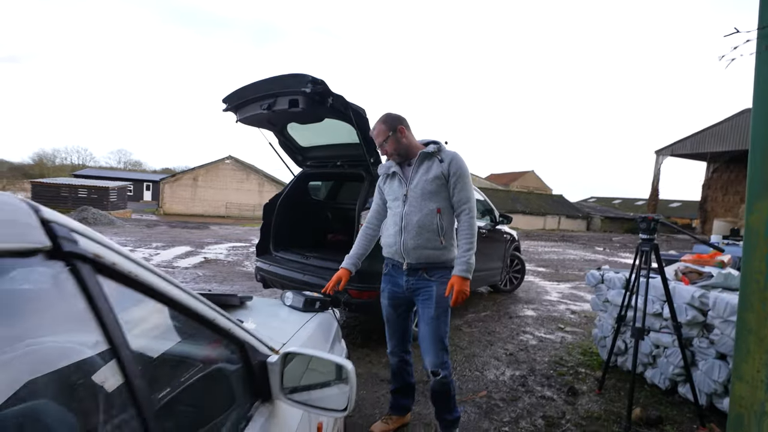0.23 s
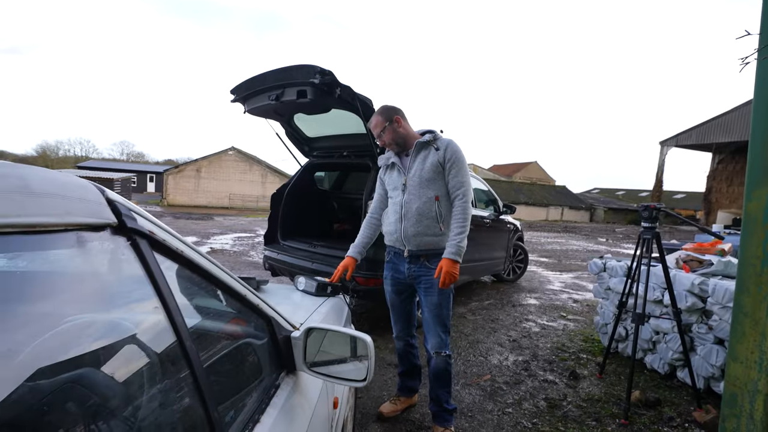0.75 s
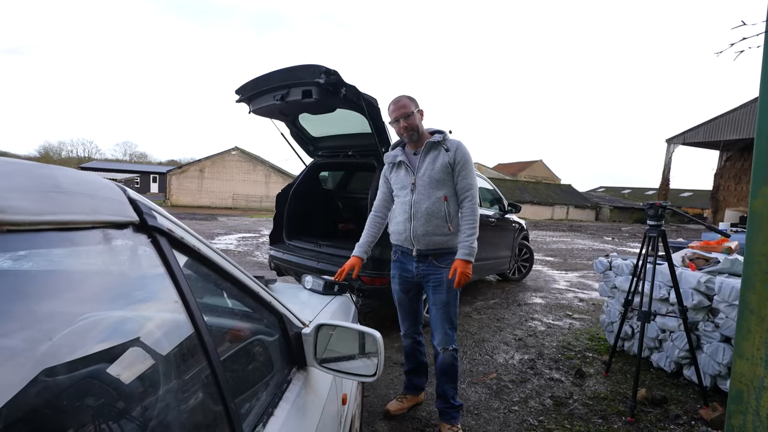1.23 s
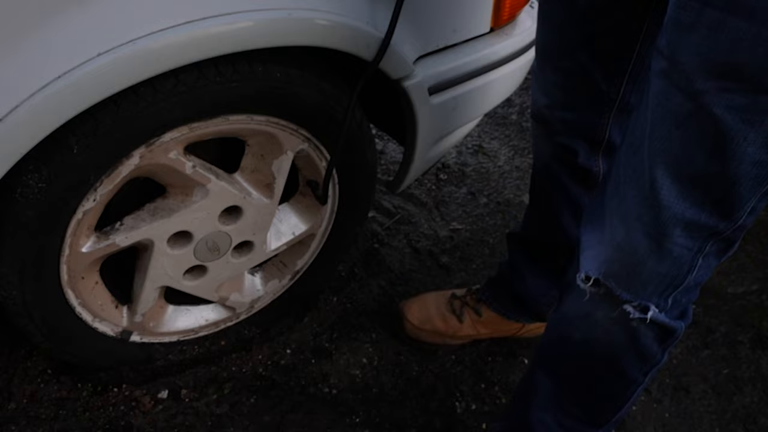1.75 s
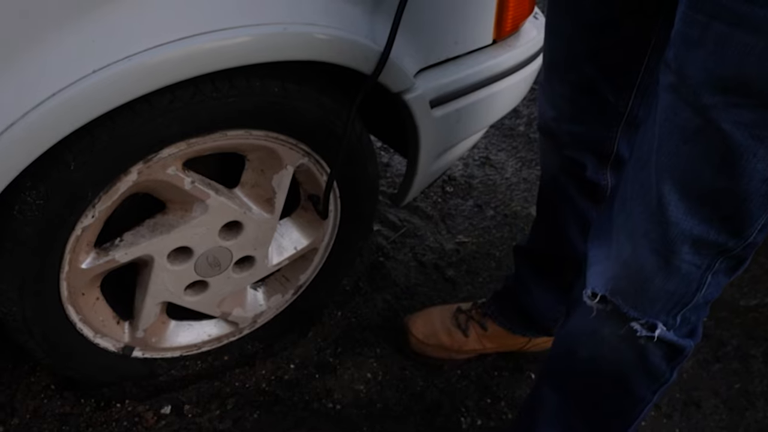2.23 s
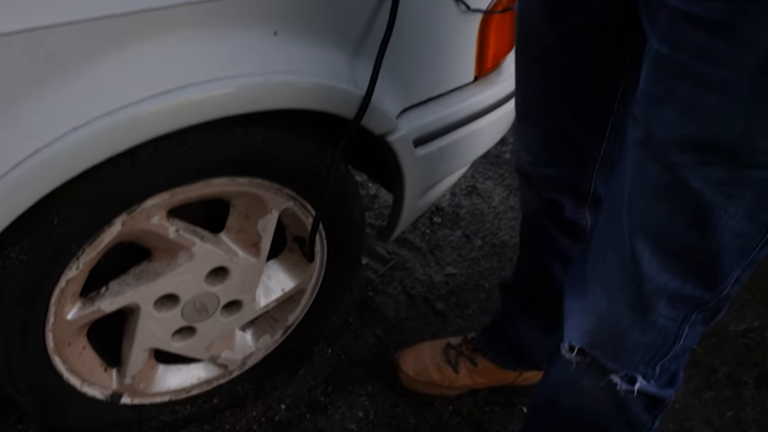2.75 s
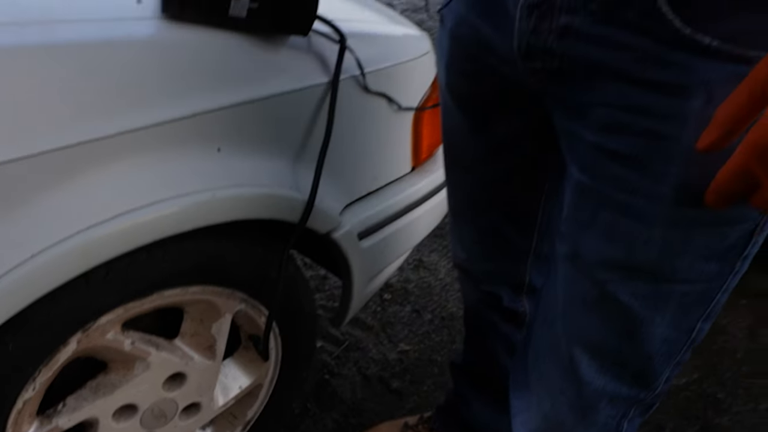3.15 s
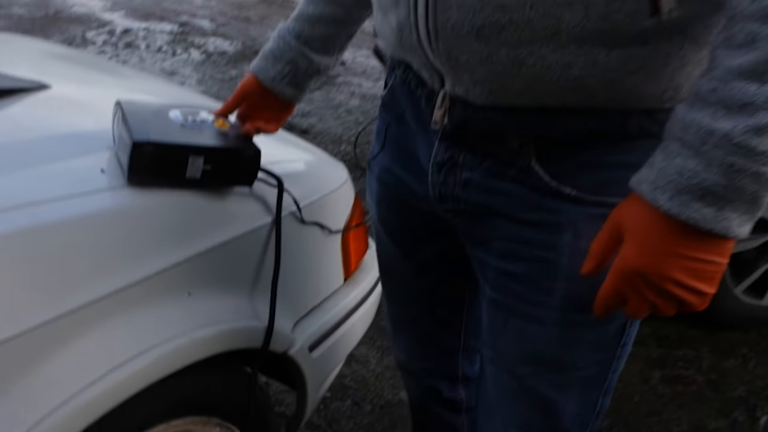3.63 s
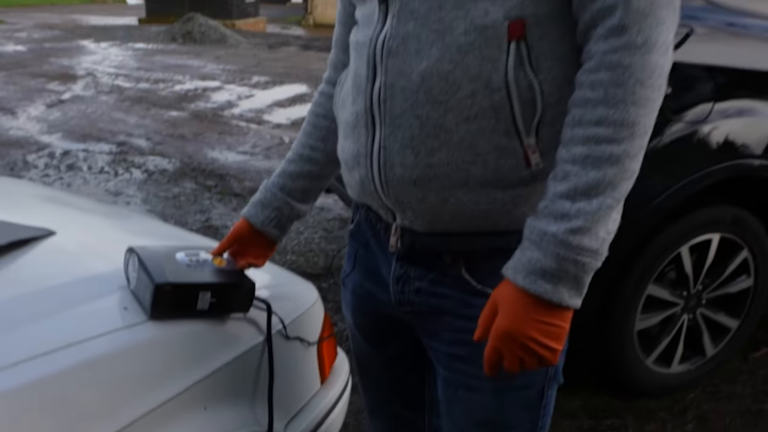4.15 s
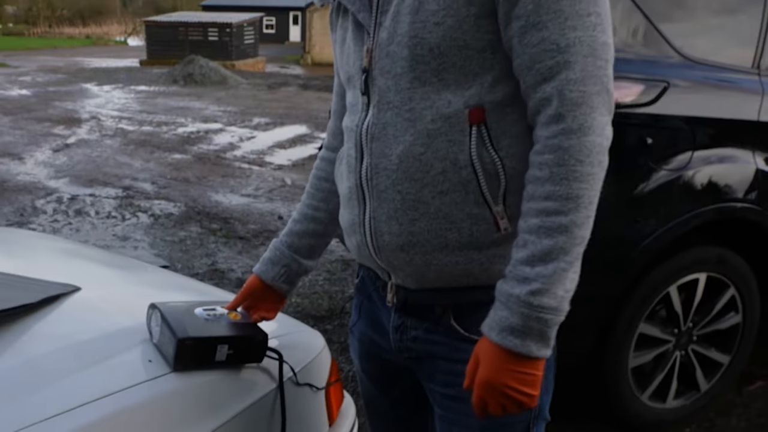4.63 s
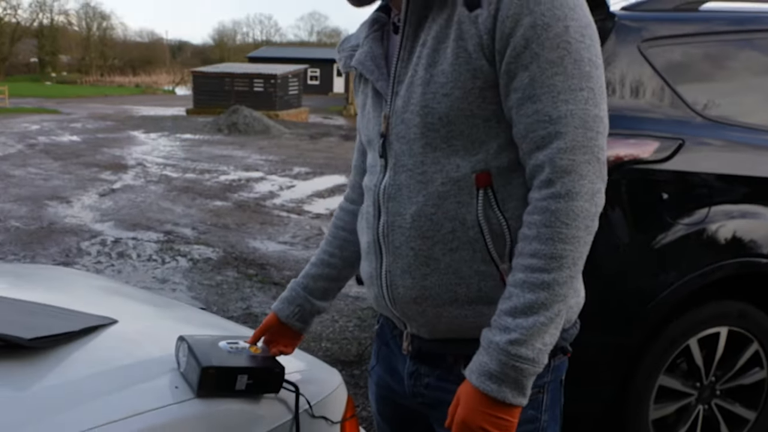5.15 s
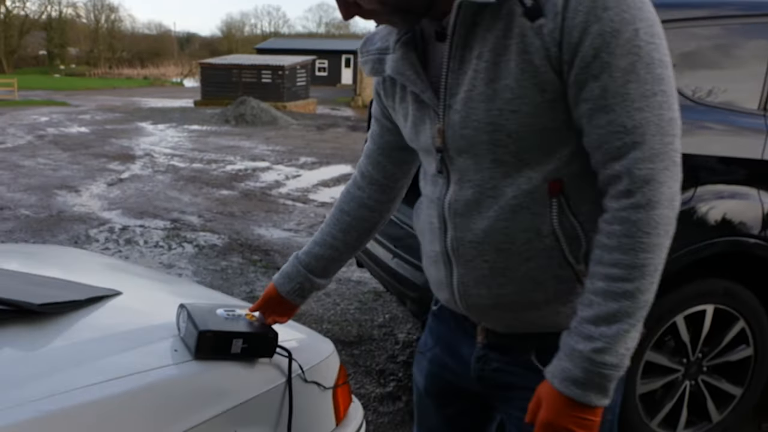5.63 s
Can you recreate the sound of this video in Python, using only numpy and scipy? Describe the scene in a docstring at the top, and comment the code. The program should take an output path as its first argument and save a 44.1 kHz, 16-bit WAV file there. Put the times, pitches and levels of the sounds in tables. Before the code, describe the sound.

Outdoor stereo pickup near a running portable air pump, louder on the right and duller on the left. The rapid throbbing buzz and valve rattle run almost throughout, heard from one spot and then another slightly lower. Soft wind rumbles, a far engine hums, and a few thuds and a scrape occur early on the left. A switch cuts the motor, leaving short ringing knocks and quiet yard air.

```python
"""Open yard: a small piston compressor buzzes on a car's boot lid, near the right microphone, shaded from the left.
Heard from two places in turn, then switched off. Delivery strokes ring head and lid (throb, buzz);
noise bursts at each contact clatter through the casing; the lid shakes with the crank. Switch and coasting knocks
are ringing cracks. Dull bumps and a noise scuff on the left; a far motorbike of summed sines enters at the
second place; wind and yard are coloured noise."""
import sys
import numpy as np
from scipy import signal
from scipy.fft import rfft, irfft, next_fast_len
from scipy.io import wavfile

SR = 44100
rng = np.random.default_rng(int(sys.argv[2]) if len(sys.argv) > 2 else 0)


def log_audio(samples):
    """Write samples as a 16-bit WAV file to the path given in sys.argv[1]."""
    # one column per channel
    frames = np.atleast_2d(samples).T
    # limit to full scale, then quantise
    limited = np.clip(frames, -1, 1)
    pcm = np.round(limited * 32767).astype(np.int16)
    wavfile.write(sys.argv[1], SR, pcm)


N = 259388

TIME = np.arange(N) / SR
SIZE = next_fast_len(N + 9000)
BIN_HZ = np.arange(SIZE // 2 + 1) * SR / SIZE + 1e-3
SIDES = np.array([[.5], [-.5]])   # left, right share of a level or phase difference
MOVE_S = 1.811   # the listening place changes
LEFT_LAG_S = .002   # clatter and rings reach the left later


def from_db(db):
    """Amplitude gain of a level in dB."""
    return 10 ** (np.asarray(db) / 20)


def rms_one(x):
    """Scale each row to rms 1."""
    return x / np.sqrt(np.mean(x ** 2, axis=-1, keepdims=True) + 1e-20)


def in_time(rows):
    """Each column after the first, joined by straight lines over TIME."""
    s, *columns = np.transpose(rows)
    return [np.interp(TIME, s, column) for column in columns]


def colour(points):
    """Gain per frequency from (hz, db) points, straight over log frequency."""
    hz, db = np.transpose(points)
    return from_db(np.interp(np.log(BIN_HZ), np.log(hz), db))


def resonance(hz, width_hz):
    """Causal second-order peak of height 1."""
    return 1 / (1 + 1j * (BIN_HZ - hz ** 2 / BIN_HZ) / width_hz)


def through(x, response):
    """Filter by a frequency response."""
    return irfft(rfft(x, SIZE) * response, SIZE)[..., :N]


def drift(knots_per_s):
    """Slow chance: random knots joined by straight lines."""
    knots = rng.standard_normal(600)
    return np.interp(TIME * np.clip(knots_per_s, .1, 99), np.arange(len(knots)), knots)


def noise_of(points, flicker_db, knots_per_s, shared=0):
    """Coloured flickering noise, left and right unrelated but for a shared part."""
    flicker = from_db(flicker_db * np.array([drift(knots_per_s), drift(knots_per_s)]))
    white = rng.standard_normal((2, N)) + shared * rng.standard_normal(N)
    return rms_one(through(flicker * white, colour(points)))


# joins between the seven clatter ranges: [Hz]
RANGE_JOINS_HZ = [1650, 2000, 2750, 3450, 3950, 6300]
# pulse modes, [place][right, left]: hz, width_below_hz, width_above_hz, delay_ms_per_100_hz
THROB_MODES = [
    [(341.2, 44.3, 76, .1), (339, 20.7, 55, .1)],
    [(339, 39.6, 45, 1.4), (345.7, 34, 43, -0.65)],
]
BUZZ_MODES = [
    [(746, 92, 73, 3.66), (746, 78, 60, 2.1)],
    [(724, 102, 79, 2.85), (721, 78, 63, 3.7)],
]
# pulse arrival after the height of the stroke, one row a place: right_ms, left_ms
THROB_ARRIVAL_MS = [(-.2, 3.76), (-1.8, 2.9)]
BUZZ_ARRIVAL_MS = [(.15, 4.1), (-1.5, 3.35)]
# extra left delay, grows early in the first place, resets at the move, grows again in the turn: time_s, longer_ms
LEFT_PATH_MS = [(.15, 0), (.6, .38), (1.811, .42), (1.812, 0), (3.6, 0), (4.2, .8)]


def pump():
    """Pressure pulses and shake stop as the motor coasts; clatter ranges fade; the left delay varies."""
    gains = pump_gains()
    running = np.clip((5.555 - TIME) / .02, 0, 1)
    strokes = per_turn(0, jitter_ms=.03, spread_db=.8)
    throb = air_pulses(THROB_MODES, THROB_ARRIVAL_MS, strokes)
    buzz = air_pulses(BUZZ_MODES, BUZZ_ARRIVAL_MS, strokes)
    left, right = running * (gains[0] * throb + gains[1] * buzz + shake())

    # power share below each join; neighbours differ by one range
    below = [0 * BIN_HZ] + [1 / (1 + (BIN_HZ / hz) ** 14) for hz in RANGE_JOINS_HZ] + [1]
    places = clatter()
    for gain, low, high in zip(gains[2:], below, below[1:]):
        band = by_place(*[through(x, np.sqrt(high - low)) for x in places])
        band_left, band_right = gain * band * from_db(.5 * drift(2.54))
        left, right = left + band_left, right + band_right
    longer_ms = in_time(LEFT_PATH_MS)[0]
    return np.array([np.interp(TIME - longer_ms / 1000, TIME, left), right])


TURN_FROM_S, TURN_TO_S = 3.6, 4.2   # the listener turns to the pump
FADE_S = 5.5
BRIGHTEN_S, BRIGHTEN_DB_PER_S = 5.08, 11   # top three ranges swell, until FADE_S
# rows: start and end of first place, start of second, before and after turning
# columns: throb, buzz, seven clatter ranges, each (right_db, left_db)
STANCE_DB = [
    [(-27.5, -31.5), (-26, -39), (-28.5, -40.5), (-46, -58), (-43.5, -65), (-54, -65), (-70, -66),
     (-44, -67), (-56, -61)],
    [(-27, -32.5), (-27.5, -38), (-30, -38.5), (-52, -59), (-44.5, -58), (-45, -66), (-50.5, -75),
     (-46.5, -65), (-55, -61)],
    [(-31.5, -31.5), (-28, -37), (-31, -41), (-53, -69), (-46, -63), (-51, -58), (-58, -62), (-45.5, -52),
     (-62.5, -54)],
    [(-31.5, -32), (-29, -35.5), (-31, -43), (-53, -67), (-45.5, -62), (-58, -64), (-59, -60), (-45.5, -61),
     (-60.5, -55.5)],
    [(-28, -32.5), (-28.5, -41.5), (-32, -39.5), (-59.5, -72), (-45, -61), (-48.5, -78), (-66.5, -66),
     (-45.5, -62.5), (-60.5, -60)],
]
# fade of those nine parts from FADE_S: [dB per s]
PART_FADE_DB_PER_S = [90, 150, 158, 158, 155, 160, 160, 157, 203]
# dips of the range holding hz: centre_s, half_length_s, hz, depth_db
RANGE_DIPS = [(0.52, 0.23, 4200, -3.5), (1.83, 0.14, 2250, -9), (3.8, .3, 3700, -3.5),
              (3.3, 0.27, 3100, -6), (3.6, 0.46, 8000, -1.5)]


def pump_gains():
    """Left and right gain of each part: glides between stances, jumps at the move, dips, swells, fades."""
    moments_s = [0, MOVE_S, MOVE_S, TURN_FROM_S, TURN_TO_S]
    gains = []
    for (right_db, left_db), fade in zip(np.transpose(STANCE_DB, (1, 2, 0)), PART_FADE_DB_PER_S):
        level_db = np.array([np.interp(TIME, moments_s, left_db), np.interp(TIME, moments_s, right_db)])
        gains.append(from_db(level_db - fade * np.maximum(TIME - FADE_S, 0)))
    for s, half_s, hz, db in RANGE_DIPS:
        gains[2 + np.searchsorted(RANGE_JOINS_HZ, hz)] *= from_db(db * np.exp(-((TIME - s) / half_s) ** 2))
    swell = from_db(BRIGHTEN_DB_PER_S * (np.clip(TIME, BRIGHTEN_S, FADE_S) - BRIGHTEN_S))
    return gains[:-3] + [swell * gain for gain in gains[-3:]]


OFF_S, COAST_S = 5.47, .2   # switch-off, time constant of the speed after it
# crank in each place: from_s, turns_done, turns_per_s, sag_turns_per_s2; whole turn = height of delivery stroke
CRANK_RUNS = [(0, .95, 39.08, .1), (1.811, 71.6, 37.02, 0)]
# wavering speed: time_s, late_ms
CRANK_LATE = [(0, -.3), (.75, .2), (1.2, 0), (1.55, .1), (1.8, -.2), (1.82, -.65), (2.45, .35), (2.7, .35),
              (2.9, -.25), (3.35, .1), (3.6, -.05), (3.8, .15), (4.3, -.2), (4.65, .3), (5.15, 0),
              (5.45, -1.3)]


def crank(time):
    """Turns done: slight sag in the first place, steady rate in the second, waver in both, then coasting."""
    time = time - np.interp(time, *np.transpose(CRANK_LATE)) / 1000
    driven = np.minimum(time, OFF_S)
    first, second = [done + rate * (driven - s) - sag / 2 * (driven - s) ** 2
                     for s, done, rate, sag in CRANK_RUNS]
    coasted = CRANK_RUNS[1][2] * COAST_S * (1 - np.exp(-(time - driven) / COAST_S))
    return np.where(time < MOVE_S, first, second + coasted)


def clicks(times_s, sizes):
    """Single-sample impulses."""
    out, at = np.zeros(N), np.round(np.asarray(times_s) * SR).astype(int)
    inside = (at >= 0) & (at < N)
    np.add.at(out, at[inside], sizes[inside])
    return out


def per_turn(turn, jitter_ms, spread_db, count=214):
    """One click each crank turn, a little uneven in time and strength."""
    chance = rng.standard_normal((count, 2))
    grid_s = TIME[::32]
    times_s = np.interp(np.arange(count) + turn, crank(grid_s), grid_s, left=-1, right=-1)
    return clicks(times_s + chance[:, 0] * jitter_ms / 1000, from_db(spread_db * chance[:, 1]))


def by_place(before, after):
    """Join the places at the move, each at rms 1 over its stretch (the second up to 5.45 s)."""
    cut, off = int(MOVE_S * SR), int(5.45 * SR)
    second = after[:, cut:] / np.std(after[:, cut:off], axis=1, keepdims=True)
    return np.hstack([rms_one(before[:, :cut]), second])


def air_pulses(modes, arrivals_ms, strokes):
    """Pulse of a few cycles in head and lid: delay varies with pitch, so it glides; trough on arrival."""
    places = []
    for pair, arrival_ms in zip(modes, arrivals_ms):
        responses = []
        for (hz, below, above, glide_ms), ms in zip(pair, arrival_ms):
            off = BIN_HZ - hz
            shape = (1 + (off / np.where(off < 0, below, above)) ** 2 / 3) ** -3
            cycles = (BIN_HZ * ms + off ** 2 * glide_ms / 200) / 1000
            responses.append(-shape * np.exp(-2j * np.pi * cycles))
        places.append(through(strokes, np.array(responses[::-1])))   # left first
    return by_place(*places)


# contacts in a turn: turns_after_delivery, decay_ms, then burst_db in each of the four drive bands
CONTACT_BURSTS = [(.72, 1.4, -5, -7, -11, -12), (.82, .7, -12, -1, -2, -6), (.26, 1.8, -9, -4, -5, -9),
                  (.38, 1.6, -4, -5, -8, -9), (.53, 1.1, -8, -6, -8, -8)]
# right noise mixed into the left, per drive band: [amplitude ratio to the left's own]
LEFT_SHARE_BY_BAND = [.55, .4, .2, .1]
# casing resonances per place: hz, width_hz (before the slope exponent), right_db, left_db
CASING_MODES = [
    [(692, 125, -3, -6), (1107, 126, -5.5, -32), (1302, 12, -6.5, -24), (1840, 100, -19, -35),
     (2460, 450, -14, -25), (2553, 48, -6, -27), (3280, 640, -13.5, -33), (3320, 58, -10, -28),
     (4154, 340, -10, -31), (5070, 390, -22, -29), (6350, 210, -31.5, -38), (7530, 320, -31, -45),
     (8700, 490, -41, -52), (10700, 1900, -40, -44), (12400, 2400, -41, -43)],
    [(671, 250, 0.5, -15), (1105, 116, -1, -27), (1408, 120, -12.5, -46), (2326, 300, -11, -59),
     (3050, 920, -14, -25), (3120, 71, -19.5, -33), (2100, 61, -10, -40), (4170, 310, -12, -26),
     (4950, 1100, -17.5, -38), (6020, 110, -25, -33), (8080, 700, -26, -49), (10900, 1400, -31, -59),
     (11500, 490, -25, -41), (12900, 3400, -34, -44.5)],
]
# reeds and rod ends per place: turns_after_delivery, hz, width_hz (each of two stages), right_db, left_db re clatter
RING_PARTS = [
    [(.2, 2530, 270, -33, -29), (.4, 1128, 264, -9.5, -27), (.8, 1150, 282, -15, -8.5),
     (.9, 548, 152, -20, -4), (.35, 5110, 600, -19, -38), (.44, 3110, 259.3, -16, -36),
     (0.65, 2590, 302.4, -28, -26), (0.72, 2366, 540, -23, -14), (0.96, 4430, 352, -15, -43),
     (0.97, 8300, 1800, -35, -26), (.86, 1384, 195, -16, -19)],
    [(.2, 2290, 350, -18, -22), (.4, 1145, 279, -15.5, -16), (.35, 5270, 450, -24, -26),
     (.38, 3067, 201, -18, -42), (.49, 11550, 380, -33, -27.5), (.53, 2045, 274, -28, -33),
     (0.57, 4800, 402, -23.5, -18), (.84, 8400, 1600, -36, -28), (0.93, 1802, 94, -21, -61)],
]


def clatter():
    """Valve, rod and gear bursts over a steady whirr, in four bands, through the casing; one signal a place."""
    edges_hz, drive = [400, 1600, 6200, 10000, 20000], np.zeros((2, N))
    bursts = []
    for turn, decay_ms, *_ in CONTACT_BURSTS:
        r = np.exp(-1000 / (decay_ms * SR))
        knocks = per_turn(turn, jitter_ms=.5, spread_db=3.5)
        # double pole: swells, then dies
        bursts.append(signal.lfilter([np.e * (1 - r)], [1, -2 * r, r * r], knocks + 1e-18))
    # gritty: some grains much stronger
    grit = from_db(2.77 * rng.exponential(1, (2, N)))
    own, right = rms_one(rng.standard_normal((2, N)) * grit)
    for k, (low, high) in enumerate(zip(edges_hz, edges_hz[1:])):
        whirr = from_db(drift(24.98))
        gate = whirr + sum(from_db(row[2 + k]) * burst for row, burst in zip(CONTACT_BURSTS, bursts))
        pair = rms_one(gate) * np.array([LEFT_SHARE_BY_BAND[k] * right + own, right])
        band = signal.butter(2, [low, high], "band", fs=SR, output="sos")
        drive += (-1) ** k * signal.sosfilt(band, pair)   # signs keep the joins full
    drive[0] = np.roll(drive[0], int(LEFT_LAG_S * SR))
    places = []
    for modes, parts in zip(CASING_MODES, RING_PARTS):
        power = sum(np.abs(resonance(hz, width) ** 1.354 * from_db([[left], [right]])) ** 2
                    for hz, width, right, left in modes)
        places.append(rms_one(through(drive, np.sqrt(power))) + rings(parts))
    return places


def rings(parts):
    """Each reed or rod end gets a click a turn and rings briefly in two resonant stages; later on the left."""
    out = 0
    for turn, hz, width_hz, right_db, left_db in parts:
        r, w = np.exp(-np.pi * width_hz / SR), 2 * np.pi * hz / SR
        sos = [[1, 0, -1, 1, -2 * r * np.cos(w), r * r]] * 2
        ring = signal.sosfilt(sos, per_turn(turn, jitter_ms=.07, spread_db=2) + 1e-18)
        out = out + from_db([[left_db], [right_db]]) * rms_one(ring)
    return np.array([np.roll(out[0], int(LEFT_LAG_S * SR)), out[1]])


# lid shake: multiple_of_turning_rate, first_place_db, second_place_db
LID_SHAKE = [(1, -49.5, -44), (2, -46.5, -51.5), (4, -59, -53.5), (5, -63, -53), (6, -46, -56.5)]


def shake():
    """Lid moves with the crank: wavering low multiples of its rate, 1.88 rad apart at the two sides."""
    turns, out = crank(TIME), 0
    for multiple, first_db, second_db in LID_SHAKE:
        level = from_db(np.where(TIME < MOVE_S, first_db, second_db) + 2.5 * drift(1.2))
        out = out + level * np.sin(2 * np.pi * round(multiple) * turns + SIDES * 1.88)
    return out


# switch, cable, last piston knocks: start_s, peak_db, left_over_right_db, hz, width_hz (each of two stages), decay_ms
TICK_EVENTS = [(1.745, -47, 4, 14100, 5000, 1.7), (5.085, -50, -10, 12500, 5000, 1.5),
               (5.483, -46, -5, 11900, 7000, 2.5), (5.546, -33.5, -17, 1180, 400, 25),
               (5.55, -37, -9, 3480, 3500, 3.1), (5.564, -38.5, -21, 790, 300, 13),
               (5.579, -40, -11, 3800, 4000, 2), (5.581, -36.5, -14, 640, 300, 25),
               (5.615, -49, -14, 4300, 1500, 4.2), (5.613, -45, -22, 1490, 1200, 8.3),
               (5.63, -43, -22, 950, 500, 15), (5.68, -48, -19, 4430, 1010, 3.6),
               (5.681, -47.5, -19, 2040, 1000, 7), (5.682, -42, -23, 690, 200, 15),
               (5.776, -48, -14, 1100, 900, 3)]


def ticks():
    """Short decaying noise cracks, each ringing around its own pitch."""
    out = np.zeros((2, N))
    for s, db, side_db, hz, width_hz, decay_ms in TICK_EVENTS:
        fade = np.exp(-np.clip(TIME - s, 0, 1) * 1000 / decay_ms) * (TIME >= s)
        crack = through(rng.standard_normal(N) * fade, resonance(hz, width_hz) ** 2)
        out += from_db(db + SIDES * side_db) * crack / np.abs(crack).max()
    return out


# dull bumps: start_s, level_db (before the soft onset), left_over_right_db, pitch_hz, t60_s
BUMP_EVENTS = [(0.346, -26.5, 23, 190, 0.16), (0.363, -33, 11, 189, 0.11), (0.463, -33, 23, 92, 0.083),
               (0.496, -40, 20, 58.7, 0.17), (0.566, -31, 26, 60.5, 0.098)]


def bumps():
    """Soft blows, each a decaying sine of one low mode."""
    out = np.zeros((2, N))
    for s, db, side_db, hz, t60_s in BUMP_EVENTS:
        age = np.clip(TIME - s, 0, 1)
        fade = from_db(db + SIDES * side_db - 60 * age / t60_s)
        out += fade * np.sin(2 * np.pi * hz * age) * (1 - np.exp(-age / 0.0098))
    return out


SCUFF_S, SCUFF_DB, SCUFF_RISE_DB_PER_S, SCUFF_FALL_DB_PER_S = 0.45, -44.5, 202, 58
# scrape spectrum: hz, relative_db
SCUFF_SPECTRUM = [(200, 8.5), (600, 8.5), (1200, -12), (2300, 4), (3500, -39), (5000, -4), (8000, -27),
                  (15000, -32)]


def scuff():
    """Coloured scraping noise swells quickly and trails off, 24 dB stronger on the left."""
    rise_db = SCUFF_RISE_DB_PER_S * (SCUFF_S - TIME)
    fall_db = SCUFF_FALL_DB_PER_S * (TIME - SCUFF_S)
    db = SCUFF_DB - np.maximum(rise_db, fall_db)
    return from_db(db + SIDES * 24.0) * noise_of(SCUFF_SPECTRUM, flicker_db=3, knots_per_s=60)


# engine slows, holds, speeds up, then drops to a lower rate: time_s, firings_per_s
FIRING_RATE = [(1.9, 50.5), (2.5, 48.5), (3.3, 46.8), (3.8, 46.6), (4.6, 50.6), (5.7, 53.6), (5.735, 42),
               (5.88, 43.5)]
# tone over time: time_s, level_db, bass_db (multiples 1 and 2), brightness_db (per multiple above 3)
BIKE_TONE = [(1.9, -49, 0.5, -5), (3.0, -51.5, 11.5, -6.5), (3.15, -44.5, 4, -25), (3.75, -39, -10, -21),
             (3.9, -44, 4, -8), (4.1, -44, 11.5, 1.5), (4.7, -44, 5.5, 0), (5.1, -41, 4, 0.5),
             (5.6, -46.5, 3, -0.5), (5.88, -48.5, -11, 3)]
# exhaust spectrum: multiple_of_firing_rate, relative_db
EXHAUST_MULTIPLES = [(1, -7.5), (2, -3), (3, 3), (4, 6), (5, 2), (6, 4), (7, -3.5)]


def bike():
    """Far exhaust: multiples of the firing rate, each wavering on the way; later and 4 dB weaker on the left."""
    firings = np.cumsum(in_time(FIRING_RATE)[0] * (1 + 0.00496 * drift(11))) / SR
    level_db, bass_db, bright_db = in_time(BIKE_TONE)
    tone = 0
    for multiple, db in EXHAUST_MULTIPLES:
        tilt_db = bright_db * max(multiple - 3, 0) + bass_db * (multiple < 2.5)
        waver_db = 1.2 * drift(2) + .7 * drift(12)
        phase = 2 * np.pi * (round(multiple) * firings + rng.random())
        tone = tone + from_db(db + tilt_db + waver_db) * np.sin(phase)
    tone = from_db(level_db) * tone * (TIME > MOVE_S)
    return np.array([from_db(-4.0) * np.roll(tone, int(0.0024 * SR)), tone])


# gusts: time_s, level_db (mean of the sides)
GUSTS = [(0, -52), (.45, -49), (1.0, -51.5), (1.5, -54), (1.9, -47.5), (2.3, -51.5), (3.15, -46),
         (3.6, -48.5), (4.2, -45), (5.3, -52), (5.88, -49)]
# wind spectrum: hz, relative_db
WIND_SPECTRUM = [(15, -26), (35, -2), (80, -6.5), (140, -8.5), (260, -16), (500, -78), (1500, -60),
                 (16000, -110)]


def wind():
    """Low rumbling noise in gusts, partly shared by the sides, 4 dB weaker on the left."""
    gust = from_db(in_time(GUSTS)[0] + SIDES * -4.0)
    return gust * noise_of(WIND_SPECTRUM, flicker_db=2.5, knots_per_s=3, shared=1.2)


YARD_DB = -47
# yard spectrum: hz, relative_db
YARD_SPECTRUM = [(100, -3), (260, 12), (400, 18.5), (800, 2.5), (1500, -0.5), (3000, -12.5), (6000, -19.5),
                 (15500, -36)]


def yard():
    """Faint background noise, unrelated at the two sides."""
    return from_db(YARD_DB) * noise_of(YARD_SPECTRUM, flicker_db=1, knots_per_s=5)


def scene():
    """Sum of all sources, left and right."""
    return pump() + ticks() + bumps() + scuff() + bike() + wind() + yard()


def record(dry):
    """Steep low-pass: 70 dB down from 16 kHz up."""
    return signal.sosfilt(signal.cheby2(16, 70, 16000, fs=SR, output="sos"), dry)


dry = scene()
out = record(dry)
log_audio(out)
```